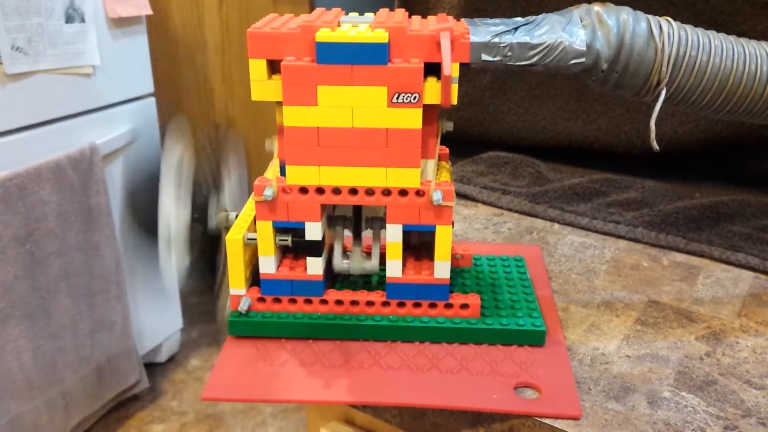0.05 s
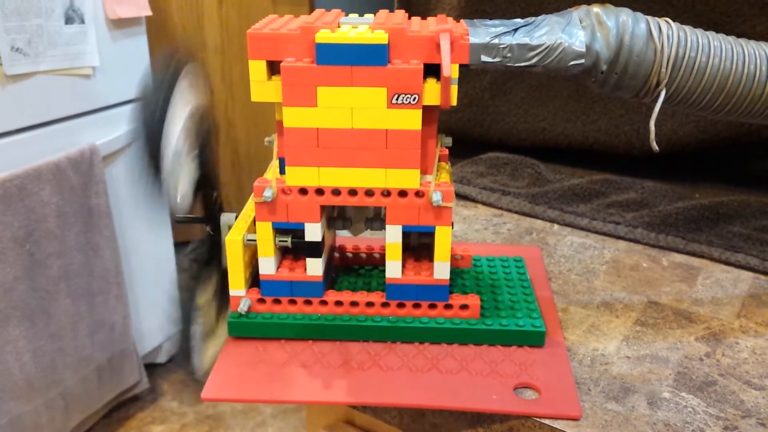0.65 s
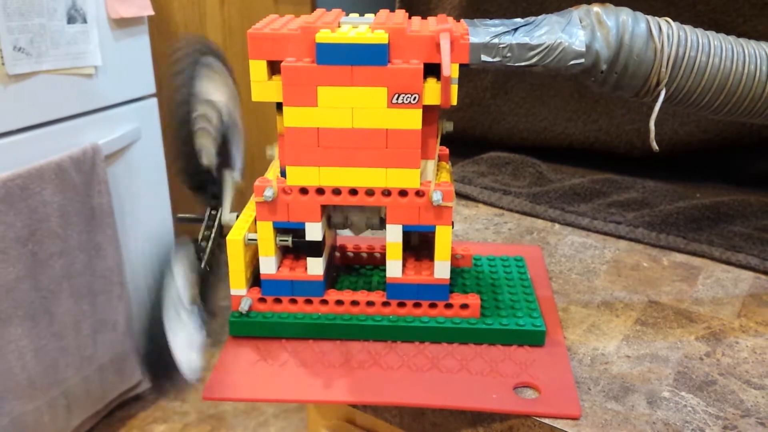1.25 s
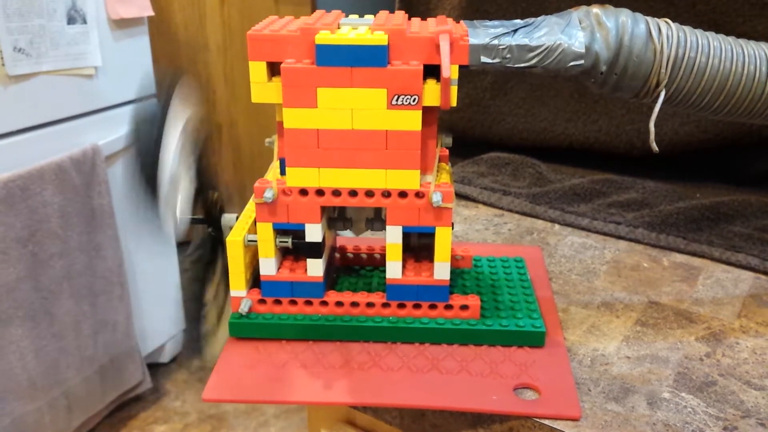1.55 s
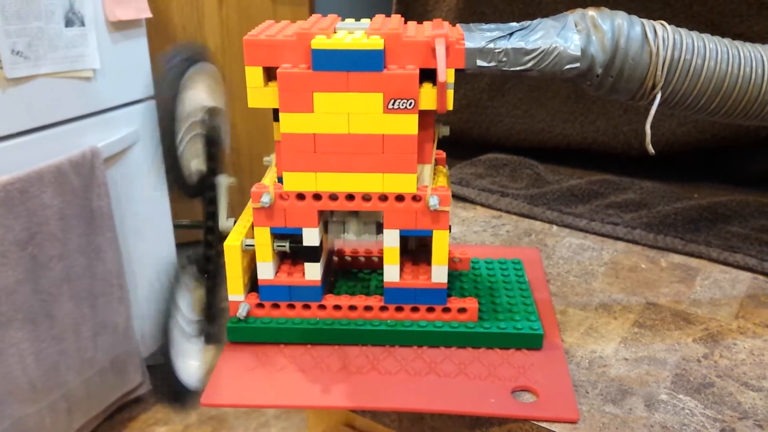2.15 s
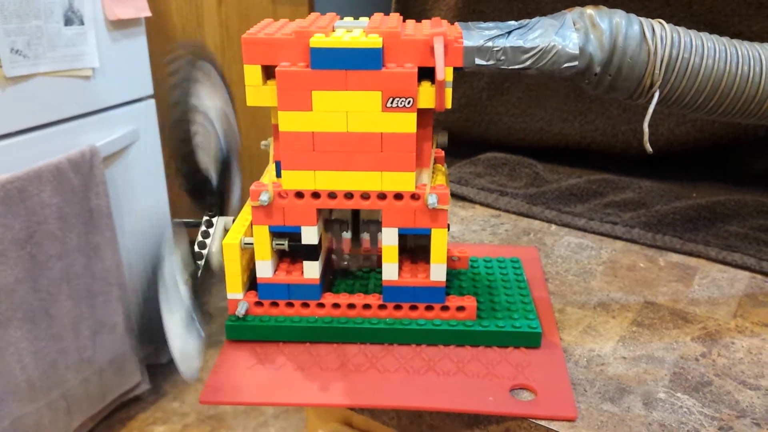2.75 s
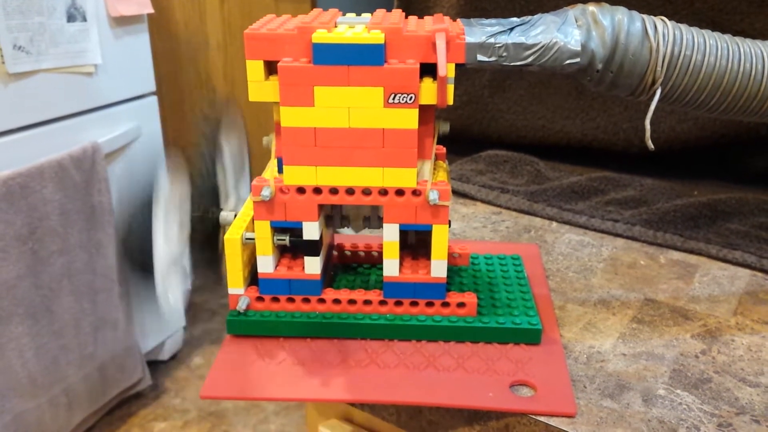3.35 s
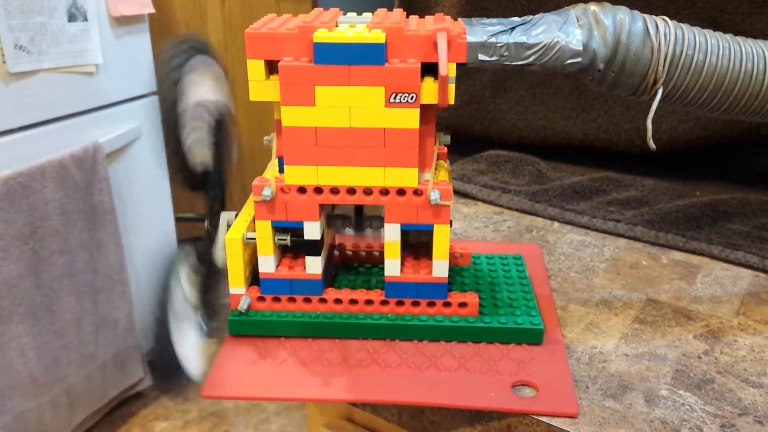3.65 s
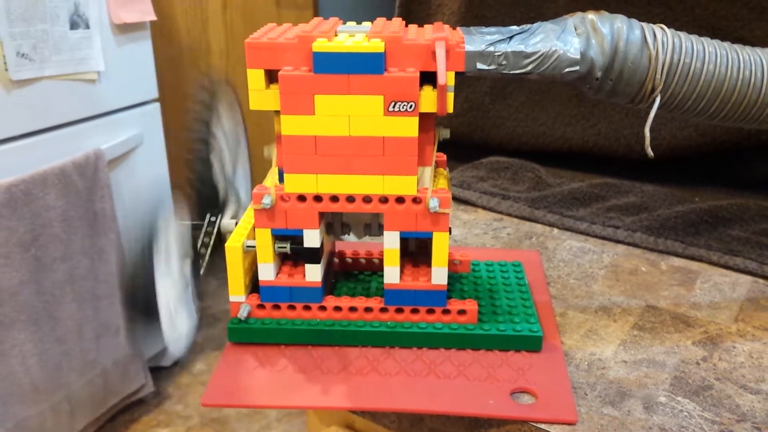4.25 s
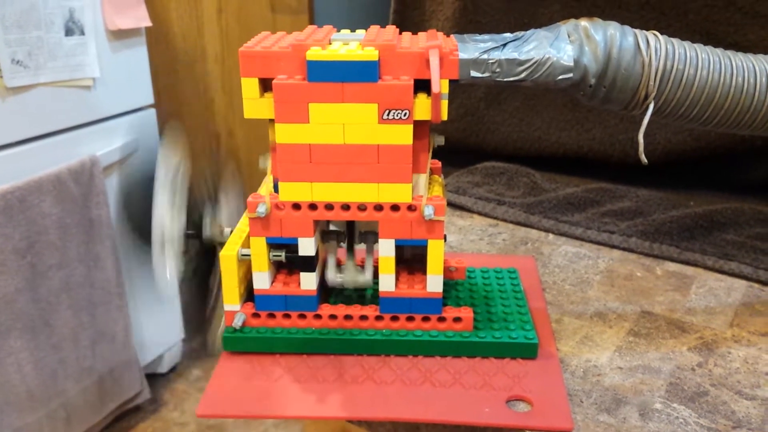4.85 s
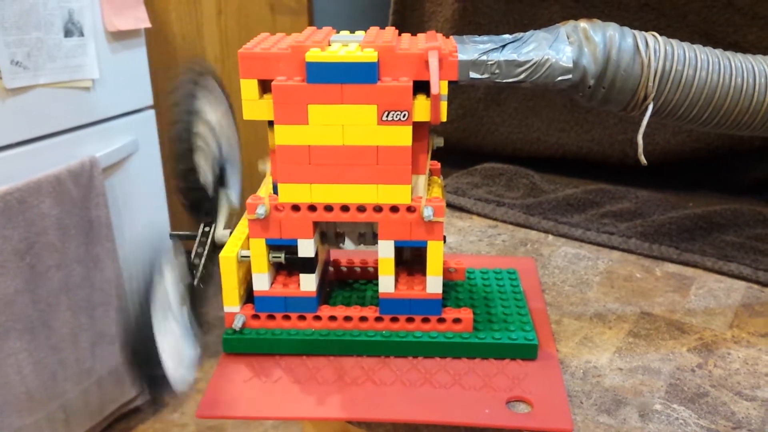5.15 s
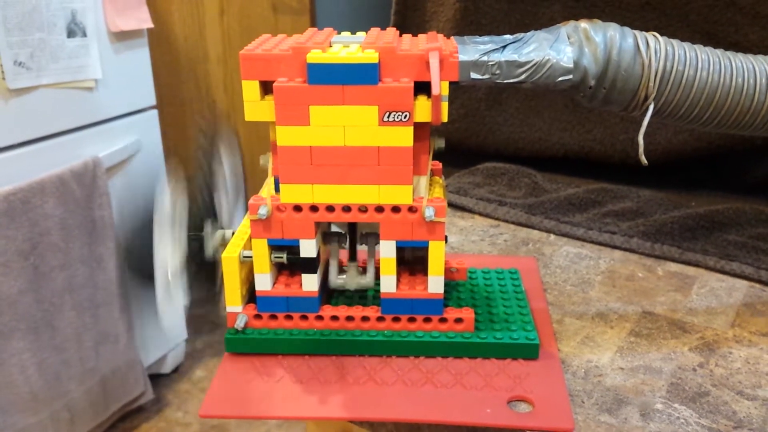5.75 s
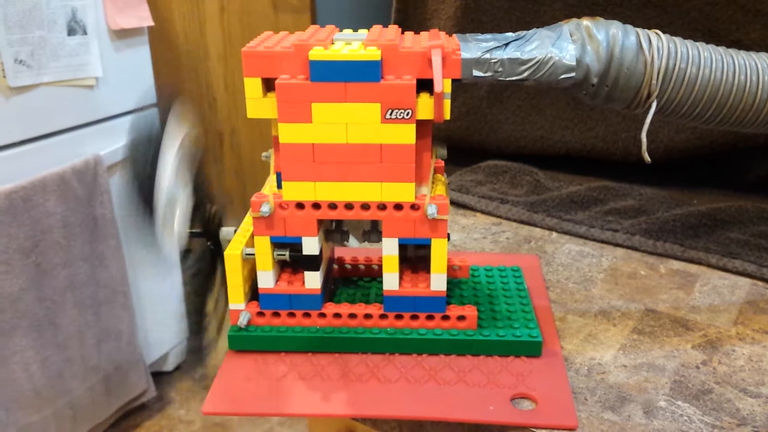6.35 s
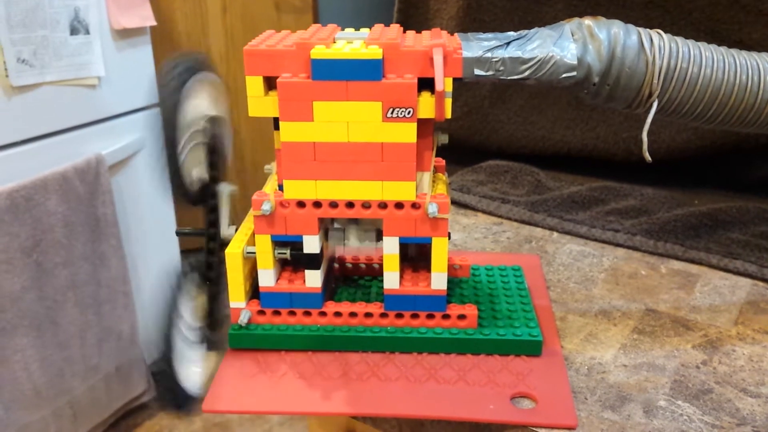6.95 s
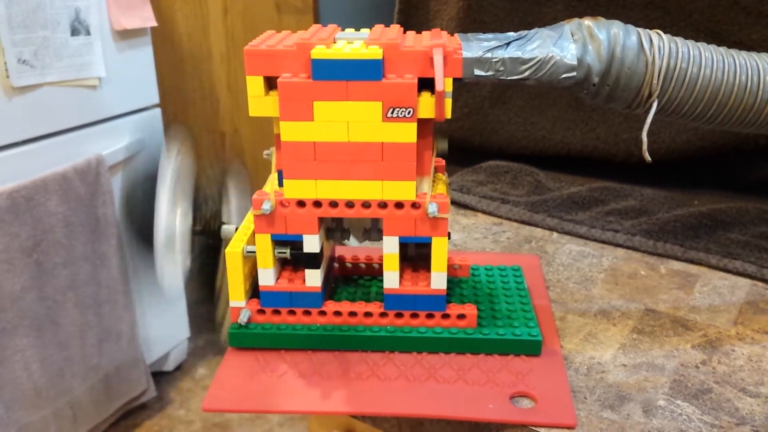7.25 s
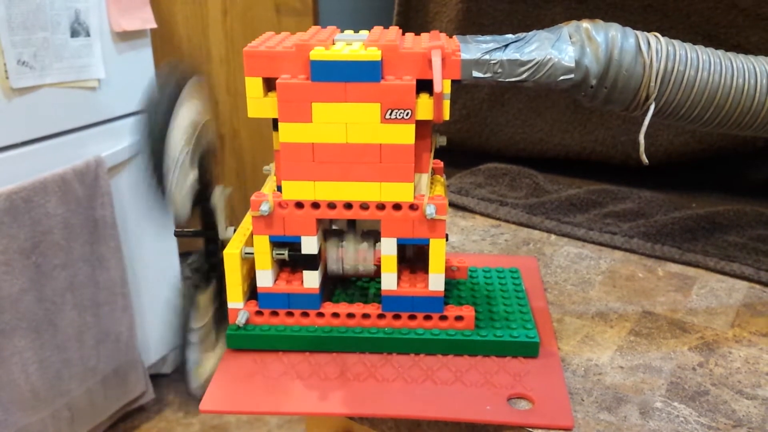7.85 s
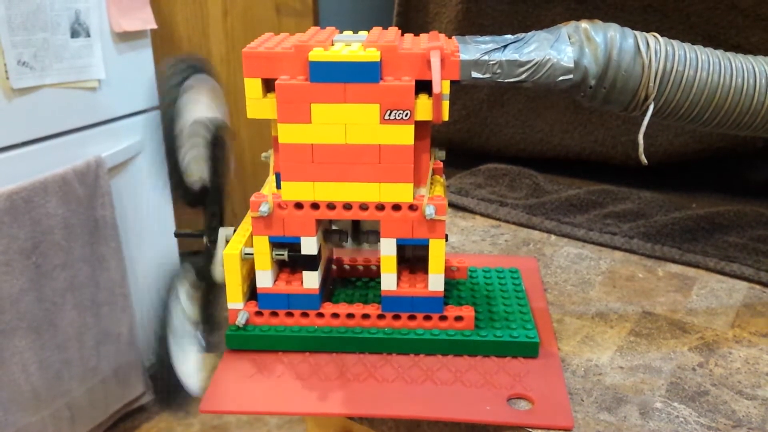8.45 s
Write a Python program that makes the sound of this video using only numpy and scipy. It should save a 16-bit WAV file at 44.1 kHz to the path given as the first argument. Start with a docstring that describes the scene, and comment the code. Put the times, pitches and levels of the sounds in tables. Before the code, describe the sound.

A small plastic brick piston engine clatters quickly and evenly on a countertop over a steady hiss of air sucked through a hose.

```python
"""A small piston engine of plastic bricks running on a kitchen countertop, heard on a stereo pair.
Suction from a vacuum cleaner's hose drives it, and air hisses through the port as it opens and shuts.
In every turn the piston knocks, the slide valve ticks and the loose crank rattles. The base rumbles on
the counter, nearby cupboards give short echoes, and the vacuum cleaner hums far off."""
import sys
import numpy as np
from scipy import signal
from scipy.fft import rfft, irfft
from scipy.io import wavfile

SR = 44100
rng = np.random.default_rng(int(sys.argv[2]) if len(sys.argv) > 2 else 0)


def wav_record(signal):
    """Record a signal, one row per channel, as 16-bit PCM in the file named by sys.argv[1]."""
    frames = np.transpose(np.atleast_2d(signal))
    bounded = np.clip(frames, -1, 1)
    # unit amplitude maps onto the largest positive 16-bit level
    quanta = np.round(bounded * 32767).astype(np.int16)
    wavfile.write(sys.argv[1], SR, quanta)


N = 379260

# modes of the engine's base on the counter: f/Hz, t60/s, left gain/dB, right gain/dB
BASE_MODES = [(71.7, 0.21, -12, -11), (87.6, 0.21, -11.5, -12.5), (118.8, 0.23, -4, -5.5),
              (165.7, 0.19, -7.5, -8.5), (205.2, 0.18, -2, -2.5), (251, 0.085, -7, -7.5),
              (547, 0.072, -4.5, -1.5)]


def from_db(db):
    """Decibels to gain."""
    return 10 ** (np.asarray(db) / 20)


def drift(rate):
    """Slow random wander with spread 1, changing about `rate` times a second."""
    r = np.exp(-80 * np.pi * rate / SR)
    slow = signal.lfilter([1], [1, -2 * r, r * r], rng.standard_normal(N // 40 + 2002))[2000:]
    return np.interp(np.arange(N) / 40, np.arange(len(slow)), slow / slow.std())


def clicks(times, level_db):
    """One click of the given height at each time."""
    out, at = np.zeros(N), np.round(np.ravel(times) * SR).astype(int)
    inside = (at >= 0) & (at < N)
    np.add.at(out, at[inside], from_db(np.ravel(level_db))[inside])
    return out


def high_pass(x, hz, order=2):
    """Small bodies radiate little below their lowest modes."""
    return signal.sosfilt(signal.butter(order, hz, "high", fs=SR, output="sos"), x)


def ring(modes, forces):
    """A body's modes, each driven by its own force; neighbours swing in opposite senses."""
    out = np.zeros((2, N))
    for k, ((hz, t60, left_db, right_db), force) in enumerate(zip(modes, forces)):
        r, w = from_db(-60 / (t60 * SR)), 2 * np.pi * hz / SR
        swing = signal.lfilter([0, np.sin(w)], [1, -2 * r * np.cos(w), r * r], force + 1e-18)
        out += (-1) ** k * from_db([[left_db], [right_db]]) * swing
    return out


def crank(first_knock_s=.0459):
    """Angle of the crank at every sample, in turns since the first knock."""
    # the crank's speed, sagging and recovering slightly: t/s, speed/(turns per s)
    speed = [(0.0, 4.426), (0.85, 4.418), (2.0, 4.356), (2.65, 4.355), (3.3, 4.389), (4.55, 4.363),
             (5.15, 4.368), (6.15, 4.411), (7.15, 4.356), (7.85, 4.352), (8.6, 4.397)]
    t = np.arange(N) / SR
    turn = np.cumsum(np.interp(t, *np.transpose(speed))) / SR
    return turn - np.interp(first_knock_s, t, turn)


def air_noise(spectrum, left_lag_s=.000055):
    """Turbulence with its own colour at each microphone; the shared part reaches the left one later."""
    # likeness of the air noise at the two microphones: f/Hz, shared power/(0-1)
    likeness = [(30, 0.45), (120, 0.99), (500, 0.88), (1100, 0.53), (2000, 0.53), (4500, 0.54),
                (8000, 0.19), (14000, 0)]
    hz = np.arange(N // 2 + 1) * SR / N + 1e-3

    def per_bin(rows):
        row_hz, *columns = np.transpose(rows)
        return [np.interp(np.log(hz), np.log(row_hz), column) for column in columns]

    alike = np.clip(per_bin(likeness)[0], 0, 1)
    white = rfft(rng.standard_normal((3, N)))
    shared = white[0] * np.exp(-2j * np.pi * hz * np.array([[left_lag_s], [0]]))
    pair = np.sqrt(alike) * shared + np.sqrt(1 - alike) * white[1:]
    return irfft(pair * from_db(per_bin(spectrum)) * np.sqrt(SR / 2), N)


def airflow(rush_db, hiss_db, rush_swing, hiss_swing, bright_swing, flutter_db, bright_hz=6500):
    """The port's hiss swells, brightens and sinks with the crank; the hose's rush follows only a little."""
    # flow through the port over one turn: angle/turns, level/dB
    port_flow = [(0, -3.4), (.05, -3.8), (.12, -3.4), (.2, -1.8), (.3, -.4), (.42, .6), (.48, -.3),
                 (.6, .1), (.68, -.7), (.78, .4), (.88, -.9)]
    # rush in the hose, with the counter's rumble: f/Hz, relative density left/dB, right/dB
    rush_spectrum = [(25, -91, -94), (48, -97, -94), (120, -75.5, -75.5), (223, -74.5, -75.5),
                     (380, -79, -78.5), (630, -74, -75.5), (1020, -70, -73), (1297, -63, -67.5),
                     (1340, -71, -78), (1840, -58.5, -67), (2375, -57, -64), (2670, -64, -69),
                     (3280, -62.5, -69), (5000, -87.5, -80)]
    # hiss at the port: f/Hz, relative density left/dB, right/dB
    hiss_spectrum = [(2940, -93.5, -87), (3370, -64, -67), (3595, -52.5, -57), (4400, -50, -53.5),
                     (4650, -54.5, -57), (5320, -50, -56.5), (6140, -55.5, -61.5), (6620, -60, -57),
                     (7460, -61.5, -48.5), (8020, -61, -49.5), (8220, -68, -60.5), (10200, -88, -62.5),
                     (10260, -73, -67), (12700, -86, -73.5), (14900, -92, -92)]
    flow_db = np.interp(crank(), *np.transpose(port_flow), period=1) + flutter_db * drift(rate=45)
    rush = air_noise(rush_spectrum) * from_db(rush_db + rush_swing * flow_db)
    hiss = air_noise(hiss_spectrum) * from_db(hiss_db + hiss_swing * flow_db)
    # the treble follows the flow more steeply
    treble = signal.sosfiltfilt(signal.butter(4, bright_hz, "high", fs=SR, output="sos"), hiss)
    return rush + (hiss - treble) + treble * from_db(bright_swing * flow_db)


def vacuum_motor(shaft_hz, wander_hz, waver_db):
    """The distant motor's shaft tone and its octave, wavering slightly."""
    # the hum at the microphones: multiple of the shaft rate, left level/dB, right level/dB
    harmonics = [(1, -58.5, -54), (2, -49.5, -46.5)]
    angle = 2 * np.pi * np.cumsum(shaft_hz + wander_hz * drift(rate=13.5)) / SR
    hum = np.zeros((2, N))
    for k, left_db, right_db in harmonics:
        level_db = np.array([[left_db], [right_db]]) + waver_db * drift(rate=22)
        hum += np.sqrt(2) * from_db(level_db) * np.sin(k * angle)
    return hum


def base_rumble(shake_db):
    """The whirling flywheels shake the base all the time; now and then it rocks and lands with a thud."""
    # soft landings of the base on the counter: t/s, force level/dB
    bumps = [(4.64, -38), (5.142, -33), (6.622, -35)]
    force = from_db(shake_db) * rng.standard_normal(N) + clicks(*np.transpose(bumps))
    return high_pass(ring(BASE_MODES, [force] * len(BASE_MODES)), hz=60, order=4)


def strike(modes, times, level_db, vary_db):
    """Each contact rings every mode of a body, with a strength of its own."""
    forces = [clicks(times, level_db + vary_db * rng.standard_normal(np.shape(times))) for _ in modes]
    return ring(modes, forces)


def clatter(play=.005, knock_spread_db=.9, tick_loss_db=2.6):
    """The same contacts come round at the same crank angles, a little loose in time and strength."""
    # contacts in one turn: t/s after the knock, force level on frame/dB, valve/dB, crank pin/dB, base/dB
    contacts = [(0.0, -5.5, -14, -22, -54), (0.00157, -17, -23, -28, -64), (0.0027, -42, -15, -24, -70),
                (0.023, -31, -40, -31, -65), (0.0306, -30, -3, -23, -47), (0.0364, -21, -12.5, -23, -48),
                (0.0501, -20.5, -16, -22, -56), (0.0851, -17, -30, -30, -57),
                (0.1088, -19.5, -10, -28, -54), (0.1117, -19.5, -10.5, -27, -46.5),
                (0.1155, -25, -22, -34, -51), (0.1257, -25, -12, -30, -49), (0.1485, -41, -28, -21, -54),
                (0.165, -28, -34, -35, -45.5), (0.202, -26, -33, -30, -58), (0.211, -27, -36, -33, -52),
                (0.2194, -24.5, -21, -33, -51)]
    knock, tick = 0, 4  # rows of the piston's knock and the valve's tick
    # modes of the brick frame, valve slide and crank pin: f/Hz, t60/s, left gain/dB, right gain/dB
    frame_modes = [(1160, .012, -1.5, -5), (1360, .012, -1.5, -6.5), (1860, .010, -12, -15)]
    valve_modes = [(1830, .006, -5, -14), (2160, .006, -1, -8), (2440, .006, -3, -5),
                   (3050, .004, -17, -20)]
    pin_modes = [(4200, 0.0021, -2, -2), (5800, 0.0039, 10, -1), (7900, .003, -14, 0)]
    turn = crank()
    turns = np.arange(-1, np.ceil(turn[-1]))[:, None]
    delay, frame_db, valve_db, pin_db, base_db = np.transpose(contacts)[:, None] * np.ones_like(turns)
    mean_speed = (turn[-1] - turn[0]) * SR / N
    # play in the linkage scatters each contact by a share of its delay
    angles = turns + mean_speed * delay * (1 + play * rng.standard_normal(delay.shape))
    times = np.interp(angles, turn, np.arange(N) / SR, left=-1, right=-1)
    # the piston knocks almost evenly; the valve mostly lands in full and now and then only grazes
    frame_db[:, knock] += knock_spread_db * rng.standard_normal(len(turns))
    valve_db[:, tick] -= tick_loss_db * rng.exponential(1, len(turns))
    frame = high_pass(strike(frame_modes, times, frame_db, vary_db=.8), hz=850, order=3)
    valve = high_pass(strike(valve_modes, times, valve_db, vary_db=1.8), hz=1400, order=3)
    pin = high_pass(strike(pin_modes, times, pin_db, vary_db=1.5), hz=3000)
    base = high_pass(strike(BASE_MODES, times, base_db, vary_db=2.5), hz=62, order=4)
    return frame + valve + pin + base


def kitchen(x, wet_db, t60):
    """The room at the microphones: direct sound, a cupboard echo and a short, dull diffuse tail."""
    # echo off nearby cupboards: t/s, relative level left/dB, right/dB
    echoes = [(.0082, -15, -15)]
    t = np.arange(SR // 2) / SR
    response = rng.standard_normal((2, len(t))) * from_db(-60 * t / t60) * (t > .003)
    response *= from_db(wet_db) / np.linalg.norm(response, axis=1, keepdims=True)
    for delay, left_db, right_db in echoes:
        response[:, round(delay * SR)] += from_db([left_db, right_db])
    response = signal.sosfilt(signal.butter(1, [300, 5000], "band", fs=SR, output="sos"), response)
    response[:, 0] = 1  # direct sound
    response /= np.linalg.norm(response, axis=1, keepdims=True)
    return signal.fftconvolve(x, response, axes=1)[:, :N]


def scene():
    """Engine and air in the kitchen, over the far motor's hum."""
    engine = kitchen(clatter() + base_rumble(shake_db=-76.5), wet_db=-11.5, t60=0.28)
    air = airflow(rush_db=2.5, hiss_db=-0.11, rush_swing=0.32, hiss_swing=1.05,
                  bright_swing=0.22, flutter_db=0.55)
    air = kitchen(air, wet_db=-11.5, t60=0.12)
    return engine + air + vacuum_motor(shaft_hz=345.2, wander_hz=2.32, waver_db=3.0)


def record(dry, cutoff_hz=15500):
    """A steep high cut on both microphone channels."""
    return signal.sosfilt(signal.ellip(12, .1, 90, cutoff_hz, fs=SR, output="sos"), dry)


dry = scene()
out = record(dry)
wav_record(out)
```